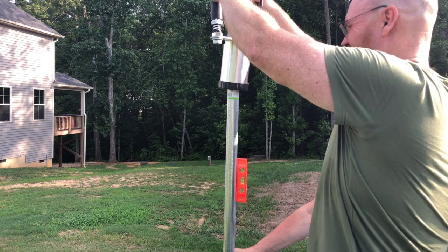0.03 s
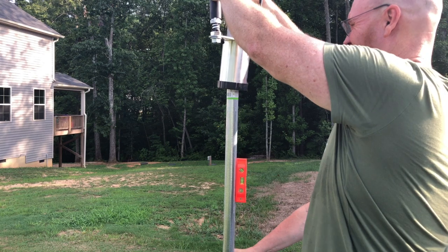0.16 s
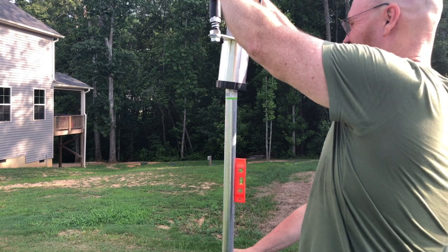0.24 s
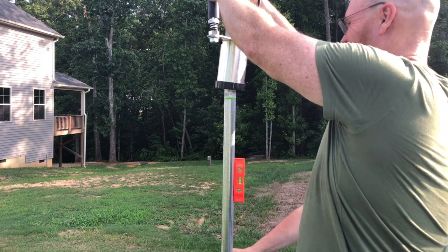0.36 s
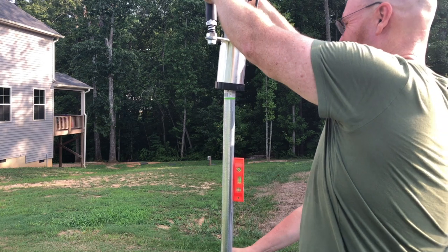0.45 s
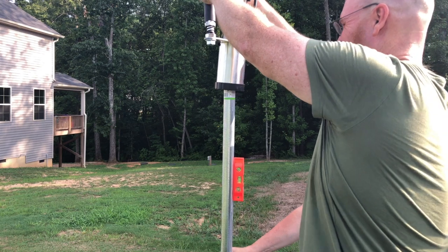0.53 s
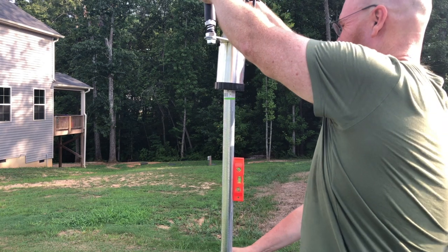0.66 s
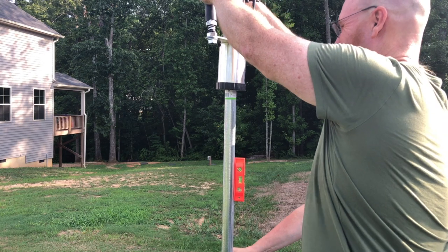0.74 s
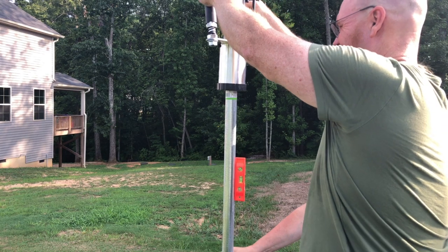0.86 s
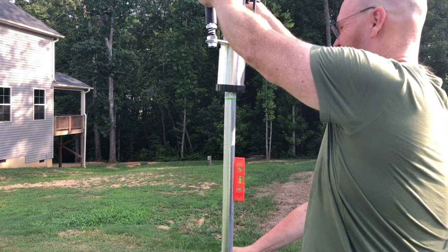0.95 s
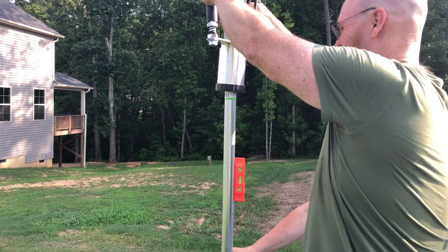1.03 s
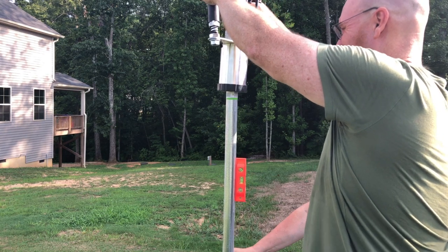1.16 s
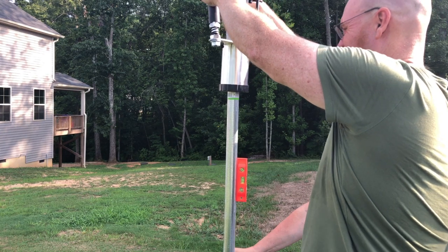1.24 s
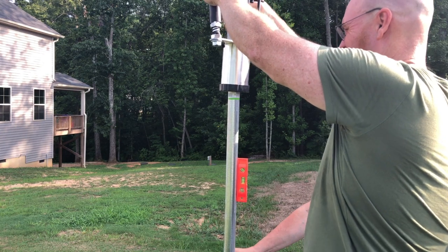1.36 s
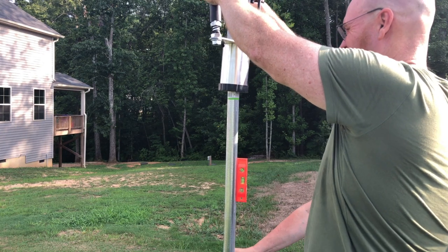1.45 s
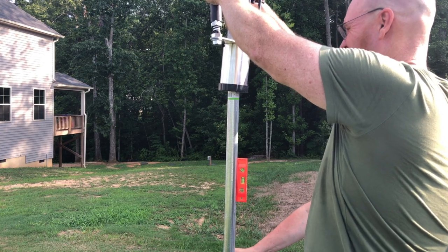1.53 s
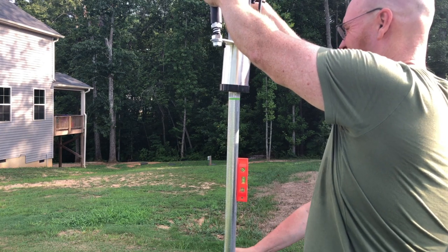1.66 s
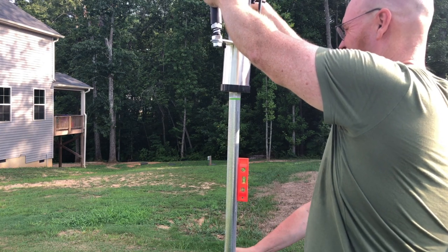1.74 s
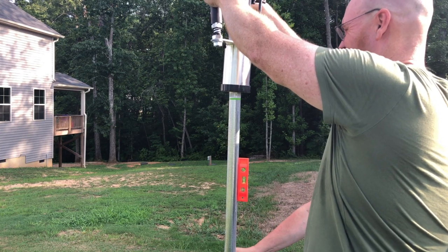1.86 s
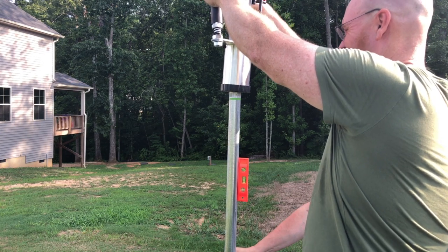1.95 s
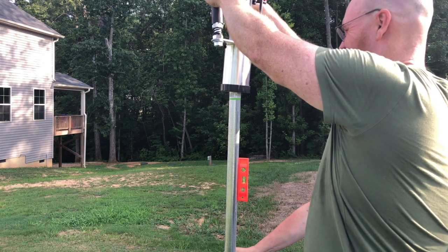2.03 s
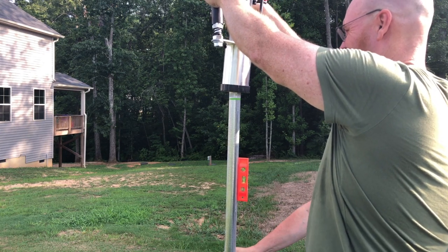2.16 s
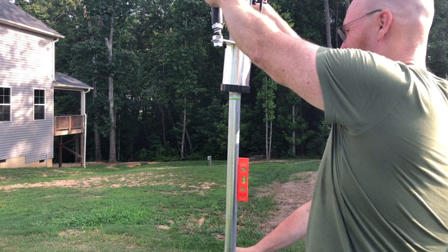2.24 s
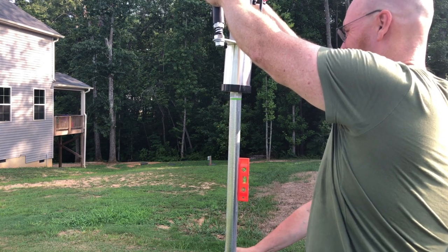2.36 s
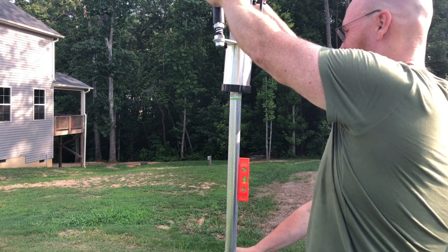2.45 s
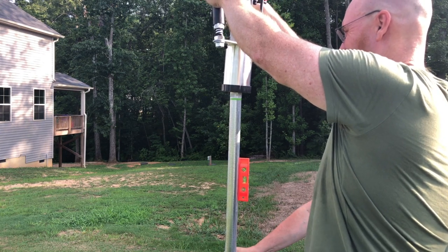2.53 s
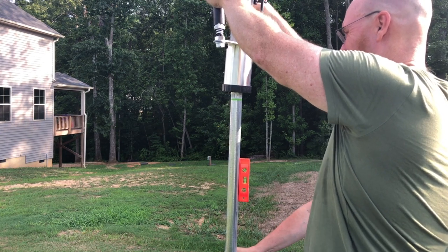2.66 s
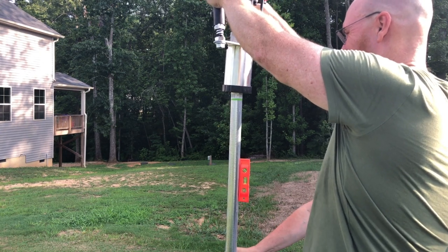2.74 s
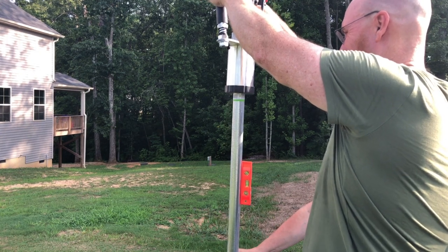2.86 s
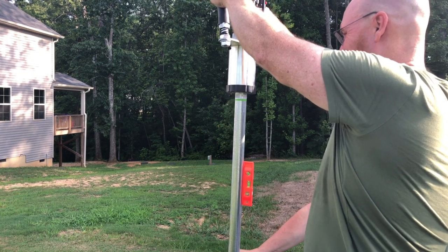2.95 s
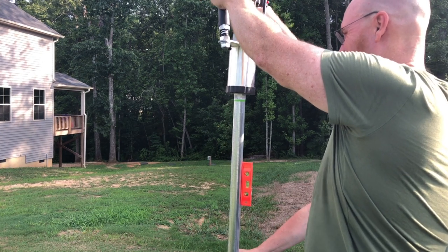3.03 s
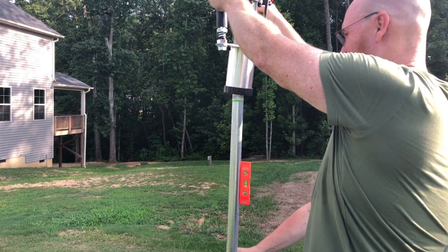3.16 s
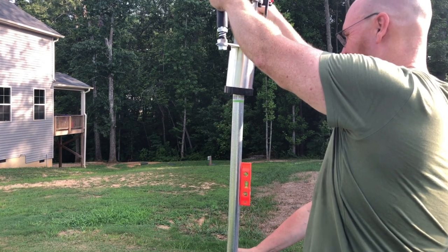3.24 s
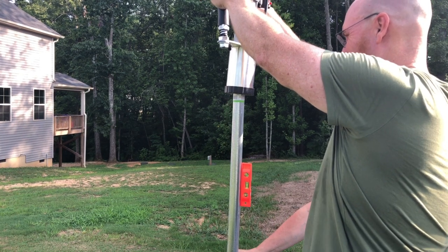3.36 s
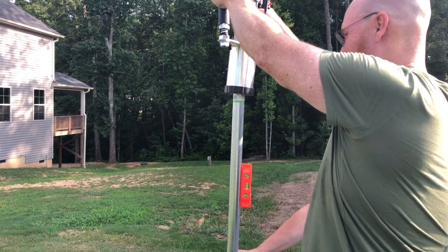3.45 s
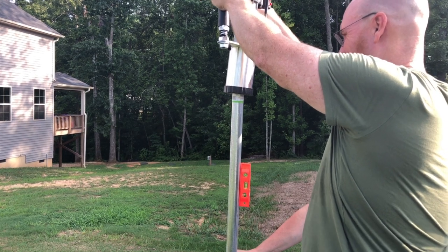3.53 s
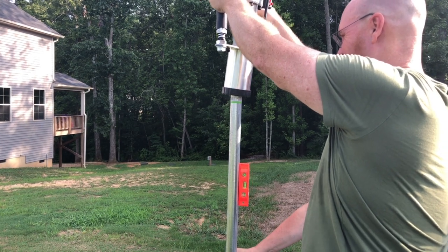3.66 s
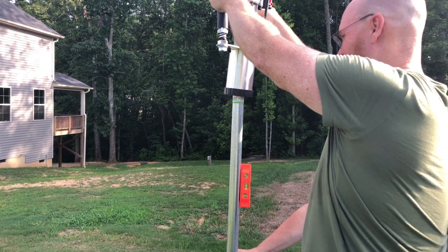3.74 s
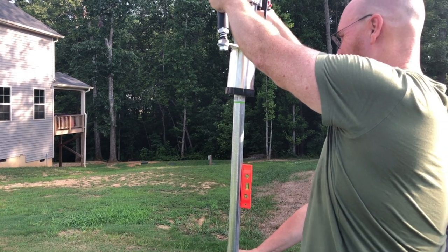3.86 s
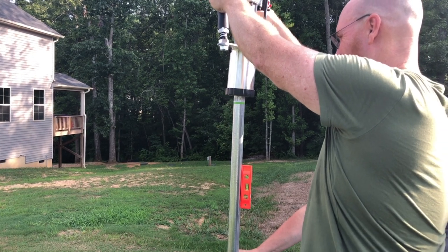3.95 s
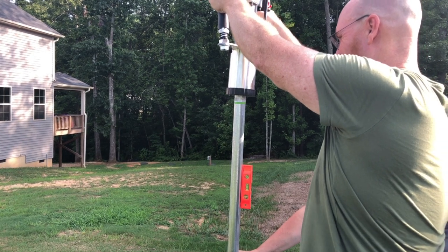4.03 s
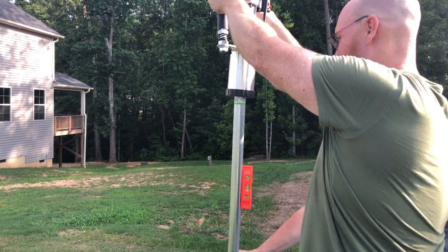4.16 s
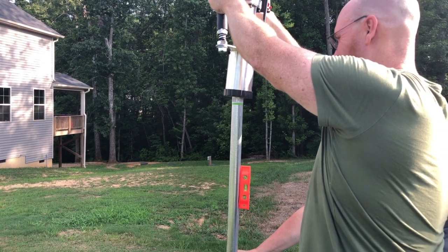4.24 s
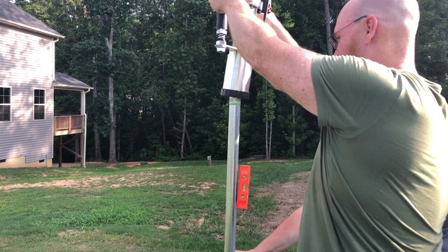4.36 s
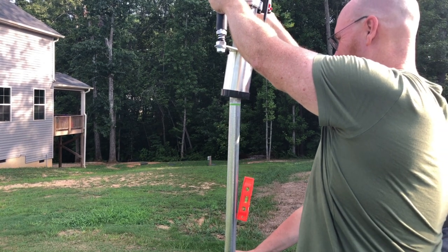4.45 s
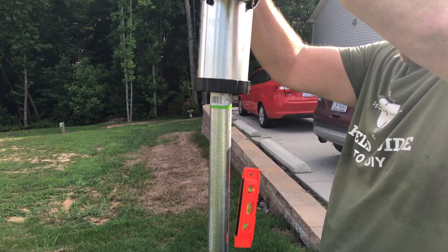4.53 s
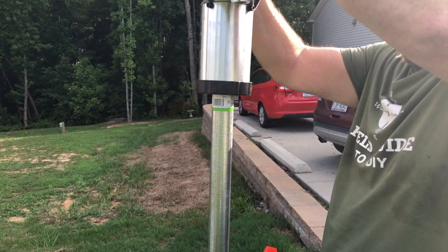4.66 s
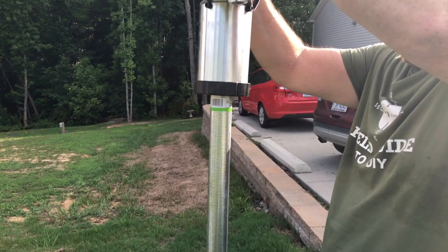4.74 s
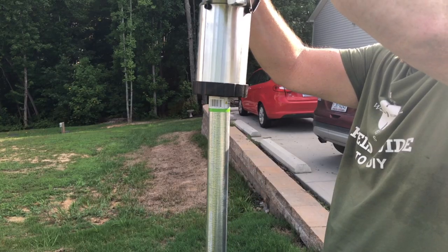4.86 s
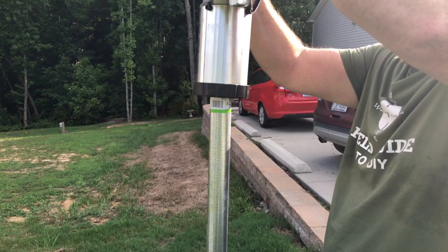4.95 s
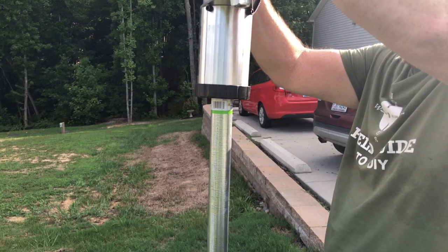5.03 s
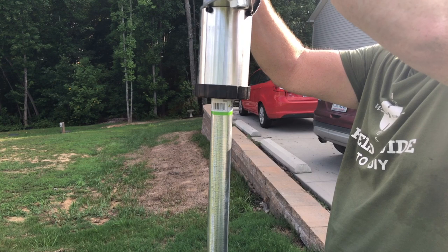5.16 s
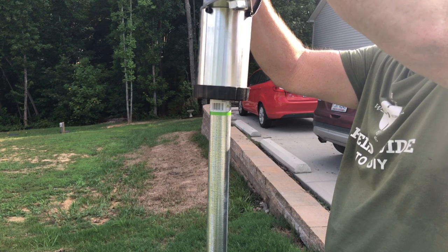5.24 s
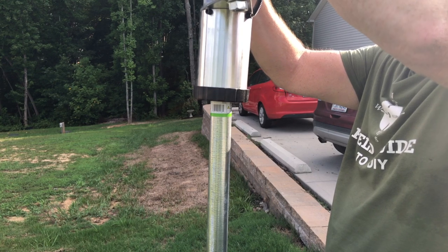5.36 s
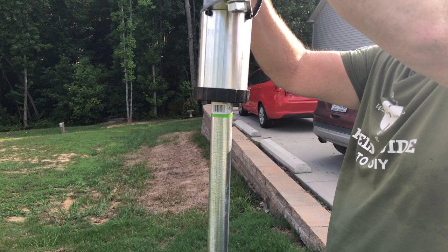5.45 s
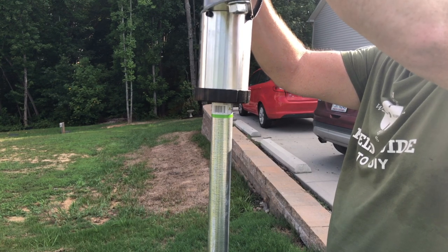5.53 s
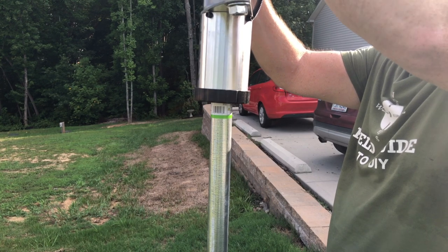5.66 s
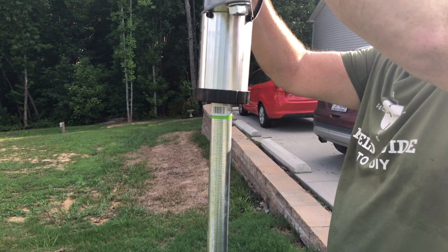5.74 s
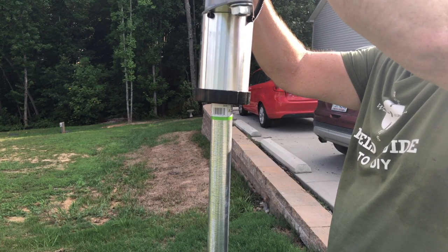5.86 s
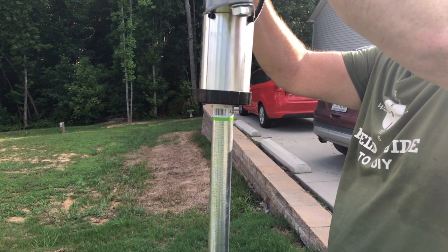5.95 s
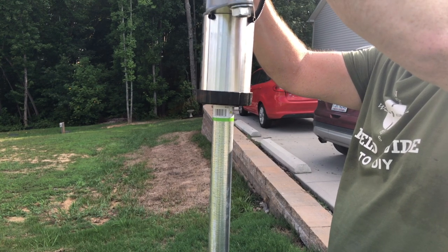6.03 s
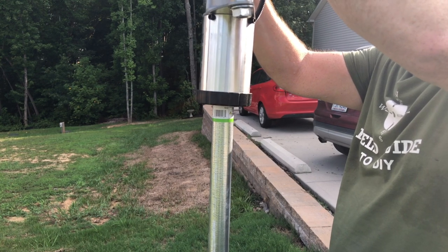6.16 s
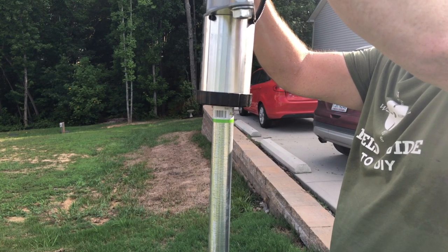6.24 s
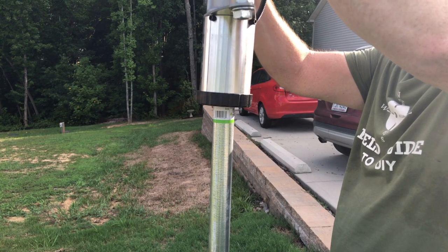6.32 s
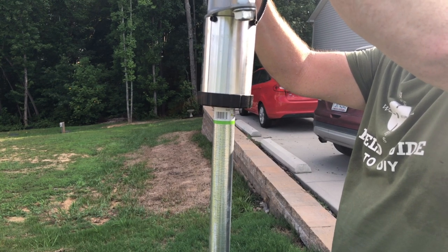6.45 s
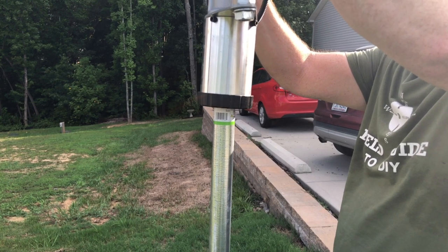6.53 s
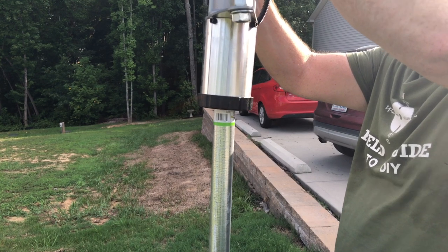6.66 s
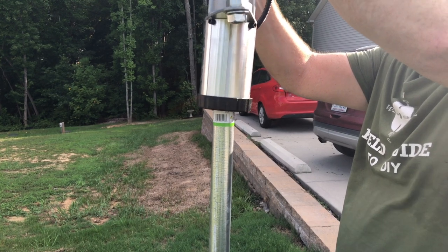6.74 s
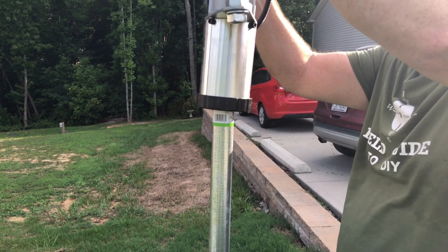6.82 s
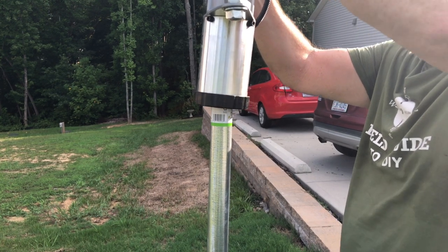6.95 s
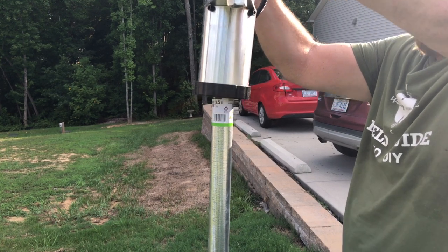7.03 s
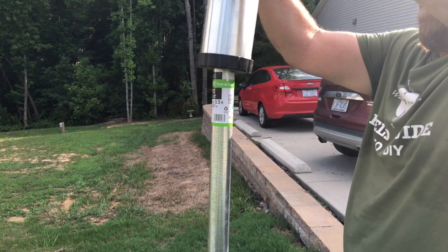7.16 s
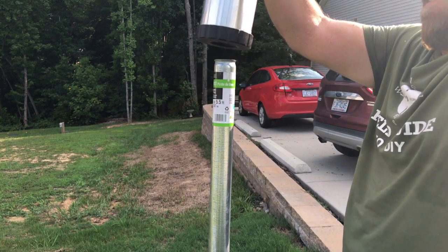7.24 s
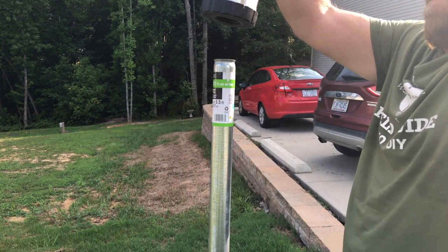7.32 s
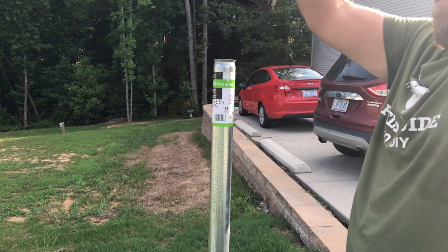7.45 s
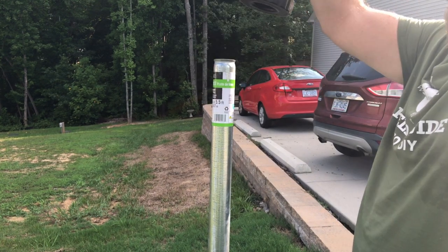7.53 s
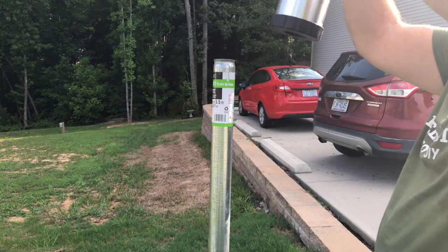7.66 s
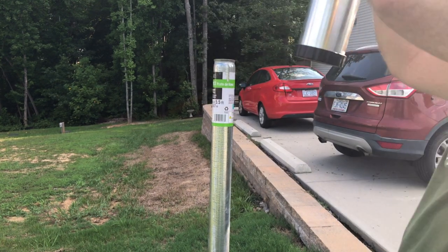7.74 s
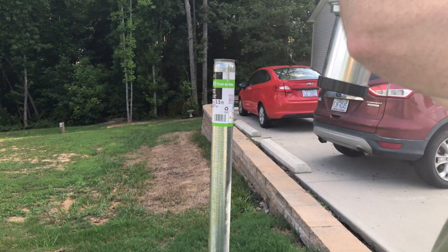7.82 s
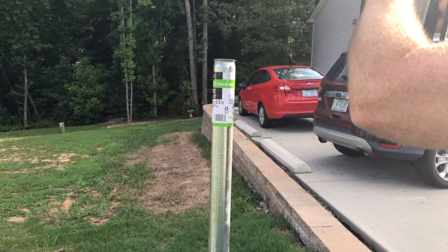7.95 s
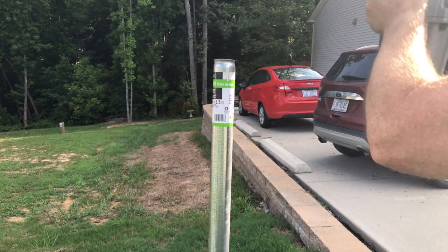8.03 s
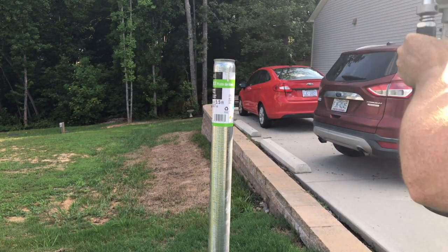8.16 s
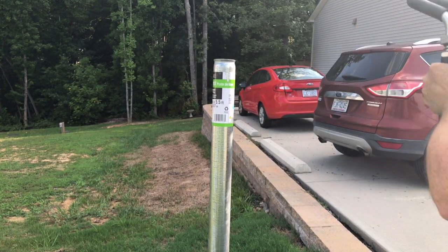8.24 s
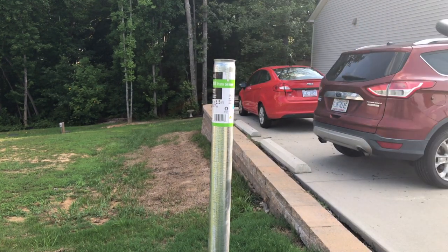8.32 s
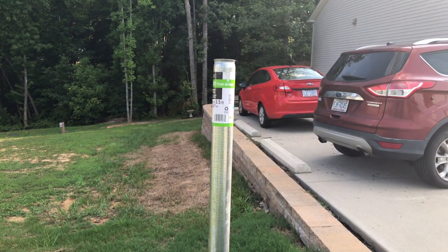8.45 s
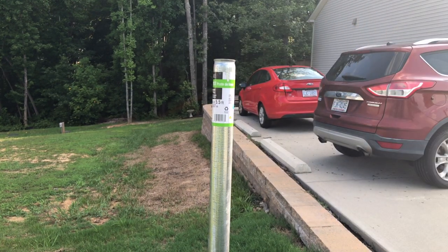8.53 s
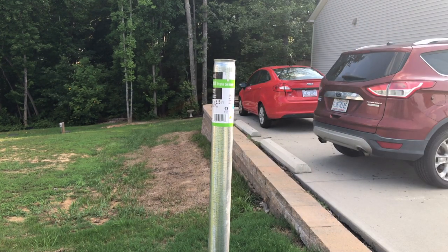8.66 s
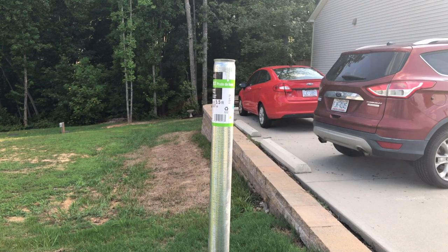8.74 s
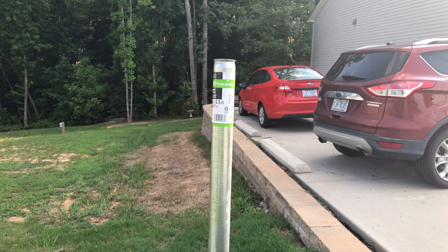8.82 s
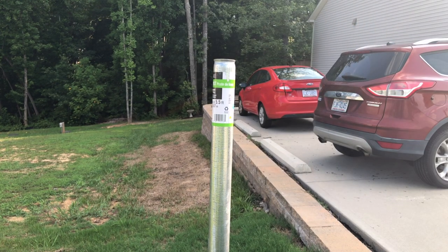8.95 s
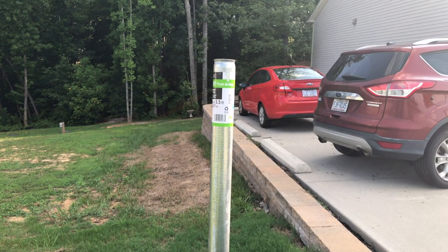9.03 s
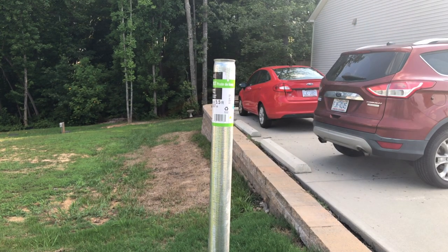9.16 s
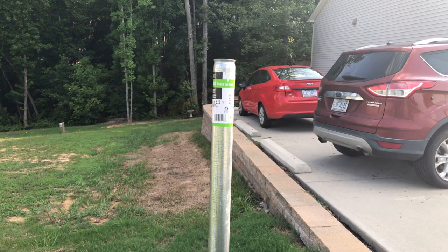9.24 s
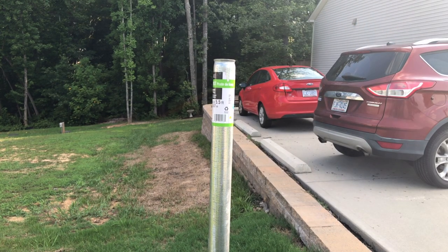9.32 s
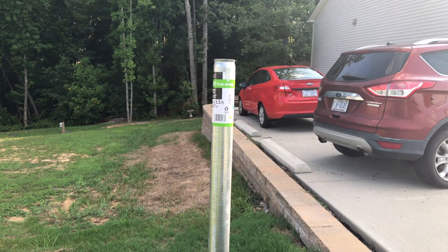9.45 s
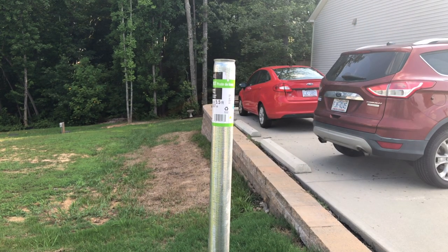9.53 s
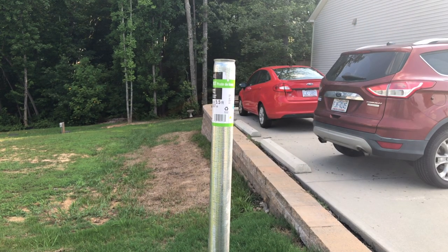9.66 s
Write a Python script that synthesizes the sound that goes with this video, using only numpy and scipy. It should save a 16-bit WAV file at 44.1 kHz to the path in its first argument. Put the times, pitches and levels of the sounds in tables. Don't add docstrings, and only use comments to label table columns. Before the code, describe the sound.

Outdoors, close to a phone microphone with dull treble. From 0 to 2.4 seconds a small four-stroke petrol engine idles, about 26 soft pops a second, slightly uneven, over a thin rattling metal casing. Around 2.5 it revs with a few light clinks, and from 2.65 it hammers a steel post: a much louder, dense machine-gun clatter of some 20 to 27 blows a second, ringing tube, rising hisses of squeezed air, engine drone and low jolts, limited to a crackle. At 4.6 the sound abruptly becomes closer and fuller, with a thin sung ring beneath. Near 6.9 to 7.2 the throttle drops and hard, bright clanks knock the freed post. It is lifted off, puttering at idle, carried past with a rattle near 8.3. At 9.15 the idle changes colour abruptly and continues to the end at about 9.7, over a faint breeze.

```python
import sys
import numpy as np
from scipy import signal
from scipy.io import wavfile
from scipy.ndimage import uniform_filter1d, minimum_filter1d

SR = 44100
rng = np.random.default_rng(int(sys.argv[2]) if len(sys.argv) > 2 else 0)


def transcribe(signal):
    frames = np.atleast_2d(signal).T
    limited = np.clip(frames, -1, 1)
    pcm = np.round(limited * 32767).astype(np.int16)
    wavfile.write(sys.argv[1], SR, pcm)


def to_linear_factor(level_db):
    exponent = np.asarray(level_db, float) / 20
    return 10 ** exponent


N = 427329


def evened(x):
    return x / np.sqrt(np.mean(x ** 2) + 1e-20)


def wander(samples):
    return evened(uniform_filter1d(rng.standard_normal(N), samples))


def band(x, lo_hz, hi_hz):
    return signal.sosfilt(signal.butter(3, [lo_hz, hi_hz], "band", fs=SR, output="sos"), x)


def modes(table, seconds):
    t = np.arange(int(seconds * SR)) / SR
    return sum(to_linear_factor(db - 60 * t / t60) * np.sin(2 * np.pi * hz * t) for hz, db, t60 in table)


def bump(t, at_ms, width_ms):
    return np.exp(-((1000 * t - at_ms) / width_ms) ** 2)


def resonate(x, hz, width):
    turn = np.exp(2j * np.pi * np.cumsum(hz) / SR)
    r = np.exp(-np.pi * width / SR)
    return 2 * (turn * signal.lfilter([(1 - r) ** 2], [1, -2 * r, r * r], x / turn)).real


def swells(rows):
    return sum(db * np.exp(-((np.arange(N) / SR - s) / length) ** 2) for s, db, length in rows)


# start in seconds, blend in seconds.
POSES = [(0, .002), (2.48, .04), (2.655, .002), (3.62, .12), (4.575, .002), (5.7, .2), (6.98, .16),
         (7.28, .06), (8.1, .15), (8.72, .2), (9.148, .002), (9.7, .002)]


def posed(values):
    t = np.arange(N) / SR
    starts = [(-1, 0)] + POSES[1:]
    return sum(v * np.interp(t, [t0 - rise, t0 + rise, t1 - fall, t1 + fall], [0, 1, 1, 0])
               for v, (t0, rise), (t1, fall) in zip(values, starts, POSES[1:]))


# time in seconds, firings per second.
IDLES = [
    [(0.036, 25.57), (0.95, 26.44), (1.5, 25.46), (2.15, 25.9), (2.4, 27.55), (2.56, 43.25)],
    [(7.001, 33.41), (7.45, 28.55), (8.0, 26.76), (8.85, 28.3), (9.145, 28.0)],
    [(9.16, 27.9)],
]
# time in seconds, firings per second.
LOADED = [(2.88, 44), (3.22, 51.6), (3.6, 45.8), (4.55, 48), (4.6, 60), (4.93, 51.5), (5.3, 56.5),
          (5.72, 50.3), (6.7, 50)]


def speed():
    return np.interp(np.arange(N) / SR, *np.transpose(sorted(sum(IDLES, LOADED))))


def turns(rate, starts):
    t, count, total = np.arange(N) / SR, np.zeros(N), np.cumsum(rate) / SR
    for k, s in enumerate(starts):
        later = t >= (s - .012 if k else 0)
        count[later] = (total - np.interp(s, t, total))[later] + 1000 * k + 1000
    return count


def beats(count):
    return np.diff(np.floor(count), prepend=0) == 1


# time in seconds, metal rattle in dB.
EFFORT = [(0, -42.5), (2.431, -42), (2.52, -36.5), (2.65, -29.5), (2.8, -20.5), (3.65, -23), (4.6, -21),
          (5.5, -23), (6.86, -25.5), (6.97, -29), (7.16, -34.5), (7.3, -44.5), (8.1, -42.5), (8.33, -36.5),
          (8.65, -43), (9.14, -38.5), (9.15, -35.5), (9.69, -40)]


def rattle_db():
    return np.interp(np.arange(N) / SR, *np.transpose(EFFORT))


ROAR_DB = [4, 5.3, -5, -5, -4, -1, -0.5, 4, 2, 5, 6]
# start in seconds, extra roar in dB, length in seconds.
SURGES = [(2.72, 7, 0.07), (3.76, 5.5, 0.072), (4.2, 1, 0.23), (4.55, 1.5, 0.15), (4.84, 2.5, 0.067),
          (6.15, 3, 0.15), (6.62, 4.5, 0.14), (5.1, -0.5, 0.069), (7.1, 1, 0.15), (8.0, -4, 0.32),
          (8.44, 2, 0.068), (8.8, 0.5, 0.067), (9.37, 2, 0.043)]


def roar_db():
    return rattle_db() + posed(ROAR_DB) + swells(SURGES)


# frequency in Hz, level in dB per Hz.
RESTING = [
    [(260, -53), (450, -3.5), (1710, -3), (2970, -14), (3720, -1), (4740, -16), (5840, -6), (7200, -22.5)],
    [(180, -38), (300, -19), (524, -9), (771, -9), (1670, -13), (2390, -13), (7200, -25.5)],
]
HAMMERING = [
    [(71, -49.5), (120, -14), (385, -5.5), (2100, -2.5), (2360, -5), (2850, -4.5), (3890, -3), (7200, -4)],
    [(71, -38), (120, -10.5), (385, -6), (2100, -0.5), (2360, -4.5), (2850, -3.5), (3890, 0.5),
     (7200, -3.5)],
    [(71, -48), (120, -16), (750, 0.5), (1190, -8), (1830, 5), (2900, -3), (5960, -4.5), (7200, -2.5)],
    [(71, -48.5), (120, -15), (319, -15.5), (689, -8), (1230, -14.5), (1860, 0), (3600, -6), (7200, -2)],
    [(260, -71), (450, -7), (1440, -11.5), (1850, -0.5), (3230, -17), (6050, -23), (7200, -30.5)],
]
CARRIED = [
    [(260, -50), (450, -16), (794, -16), (1030, -17), (2900, -19), (4220, -17.5), (7200, -26)],
    [(260, -40), (450, -4), (1130, -12), (1310, 2), (2280, -8), (2750, -19), (7200, -25)],
    [(260, -41), (450, -17), (581, -28), (1100, -15), (1960, -18), (2800, -30), (4600, -22), (7200, -33)],
    [(260, -10.5), (450, -6), (477, -39), (1150, -12), (1610, -10.5), (3760, -11), (7200, -17.5)],
]
# frequency in Hz, width in Hz.
RESTING_RINGS = [
    [(754, 90), (1235, 40), (1735, 100), (1987, 60), (2290, 150), (2595, 80), (3215, 90), (3625, 85),
     (3850, 250), (4120, 250), (5280, 130), (5630, 100), (5800, 50), (6100, 200)],
    [(508, 95), (990, 79), (1650, 350), (2620, 66)],
]
HAMMERING_RINGS = [
    [(1620, 260), (2092, 80), (2615, 80), (3192, 100), (3795, 75), (3995, 45), (4265, 75), (5085, 65),
     (5580, 70), (6490, 80)],
    [(1285, 100), (1680, 220), (2090, 75), (2610, 125), (3200, 105), (3800, 110), (5100, 105), (5570, 65),
     (6480, 105), (7050, 65)],
    [(770, 230), (1860, 150), (2090, 65), (2520, 100), (3810, 105), (4480, 400), (5880, 110), (7100, 110)],
    [(690, 400), (1845, 160), (2270, 340), (2500, 120), (4330, 450), (5880, 230), (7110, 90)],
    [(802, 200), (1850, 85), (2180, 100), (2490, 25), (4050, 260), (5850, 75)],
]
CARRIED_RINGS = [
    [(775, 65), (1630, 60), (1962, 150), (2340, 150), (3680, 140), (4090, 320), (4570, 80), (5615, 95)],
    [(791, 110), (960, 40), (1100, 80), (1480, 50), (1960, 90), (2300, 75), (3470, 65), (4150, 600),
     (4580, 250)],
    [(760, 90), (850, 50), (965, 50), (1128, 95), (1480, 90), (1955, 140), (3570, 120), (3790, 150),
     (4200, 320), (5290, 60)],
    [(786, 200), (1140, 110), (1920, 115), (2340, 120), (3120, 130), (3840, 270), (4550, 150), (5250, 170)],
]
RINGS_DB = [
    [-5.5, -5.5, -2, -4.5, -29.5, -17.5, -6, -4.5, -13.5, -11, -9.5, -22, -12, -19.5],
    [-2.5, 0, 4, -21],
    [-1.5, 2, 1, 2, -3.5, -1.5, -4, -4.5, -9.5, -5.5],
    [-10.5, 1.5, 2, -0.5, -4.5, -6, -12.5, -18, -3, -8],
    [-14.5, -1.5, -5.5, 0.5, -5, -7, -4, -3.5],
    [-22.5, 5.5, -5, -6.5, -3, -5, -1.5],
    [-19.5, 2.5, 0.5, 5.5, -13, -18],
    [-10.5, -13, -16.5, -18, -14, -18, -23, -16.5],
    [3.5, -4, 3, 8, 2, -3, -10.5, -16, -18],
    [-2, -5, -3, 7, 2, 3.5, -3, -8, -7, -20],
    [-1.5, -2.5, -16, -14.5, -14, -6, -13, -23],
]
BED_DB = [-7, 2, -2, -1.5, 1.5, -1.5, -8.5, -2.5, -2, 9, -1.5]
HISS_SHARE = [0, 0, 2.6, 2.6, 2.0, 1.3, 0, 0, 0, 0, 0]


def clatter(cycle, blow, hammering):
    t = np.arange(N) / SR
    ticks = to_linear_factor(5.4 * np.minimum(rng.exponential(1, N), 4))
    ticks = ticks * (rng.random(N) < 2500 / SR) * rng.choice([-1, 1], N)
    drive = rng.standard_normal(N) + 0.77 * evened(ticks)
    habit = rng.standard_normal(1650)[(cycle % 1 * 1650).astype(int)] * (1 - hammering)
    valves = 1 + 1.9 * np.exp(-(cycle % 1) / 0.31) + .5 * np.exp(-((cycle - .45) % 1) / 0.34)
    valves = uniform_filter1d(valves, size=110)
    strength = to_linear_factor(2.5 * rng.standard_normal(4000)[blow.astype(int)])
    chatter = 1.6 + 2.35 * strength * np.exp(-(blow % 1) / .5)
    chatter = chatter * hammering + valves * (1 - hammering)
    bounce_db = 3.5 * hammering
    flutter = to_linear_factor(.8 * wander(1800)) * to_linear_factor(bounce_db * wander(260))
    hiss = rising_hiss(blow, hammering)
    low, high = np.zeros(N), np.zeros(N)
    poses = zip(POSES, POSES[1:], RESTING + HAMMERING + CARRIED,
                RESTING_RINGS + HAMMERING_RINGS + CARRIED_RINGS, RINGS_DB, BED_DB, HISS_SHARE)
    for (t0, rise), (t1, fall), colour, places, heights, bed_db, share in poses:
        a, b = max(round((t0 - rise) * SR), 0), min(round((t1 + fall) * SR), N)
        gate = np.interp(np.arange(a, b) / SR, [t0 - rise, t0 + rise, t1 - fall, t1 + fall], [0, 1, 1, 0])
        gate = np.sqrt(gate)
        held = np.sqrt(np.mean(gate ** 2))
        rings = [(hz, width, db) for (hz, width), db in zip(places, heights)]
        taps = body(colour, rings, bed_db)
        shaking = (drive + habit) * valves ** 0.55 + share * hiss
        striking = drive[::-1] * chatter * flutter + share * hiss
        roar = signal.oaconvolve(shaking[a:b] * gate, taps)[:N - a]
        ring = evened(signal.oaconvolve(striking[a:b] * gate, taps)[:N - a])
        if hammering[a:b].any():
            ring[:b - a] += 0.59 * struck(drive[a:b], blow[a:b], rings) * (gate * hammering[a:b])
        if share == 0:
            casing = band(roar, 1300, 2750) / np.std(band(roar, 1900, 2600))
            ring = band(ring, 2600, 7600) - np.std(band(ring, 1900, 2600)) * casing
        low[a:a + len(roar)] += held * band(roar, 25, 1900) / np.std(band(roar, 600, 1900))
        high[a:a + len(ring)] += held * evened(band(ring, 1900, 7600))
    sunk = np.interp(t, [3.8, 4.2, 4.57, 4.6], [0, 0.15, 0.46, 0.0])
    treble = signal.sosfiltfilt(signal.butter(2, 3000, "high", fs=SR, output="sos"), high)
    return to_linear_factor(roar_db()) * low + to_linear_factor(rattle_db()) * (high - sunk * treble)


def rising_hiss(blow, hammering):
    stroke = blow + .22
    number = stroke.astype(int)
    force, pitch = rng.standard_normal((4000, 2)).T
    hz = 1380 * to_linear_factor(4.2 * (stroke % 1) + .6 * np.clip(pitch[number], -1.5, 1.5))
    hz = hz * to_linear_factor(.6 * wander(350))
    hiss = evened(resonate(rng.standard_normal(N), hz, 520)) * hammering * .3
    return hiss * to_linear_factor(1.5 * force[number]) * np.interp(np.arange(N) / SR, [4.1, 4.4], [1, .6])


# frequency in Hz, level in dB per Hz.
DULL_TOP = [(9360, -55), (15800, -120)]


def body(colour, rings, bed_db):
    hz = np.abs(np.fft.fftfreq(8192, 1 / SR))
    f, db = np.transpose(colour + DULL_TOP)
    power = to_linear_factor(2 * (np.interp(np.log(hz + 1), np.log(f), db) + bed_db))
    for f0, width, top_db in rings:
        power = power + to_linear_factor(2 * top_db) / (1 + (2 * (hz - f0) / width) ** 2) ** 2
    log_gain = np.log(power + 1e-9) / 2
    return np.fft.ifft(np.exp(log_gain - 1j * signal.hilbert(log_gain).imag)).real[:4096]


def struck(drive, blow, rings):
    out = np.zeros(len(drive))
    for hz, width, db in rings:
        if hz > 1900:
            share = to_linear_factor(db + 5 * np.clip(rng.standard_normal(4000), -2, 2))[blow.astype(int)]
            peak = signal.iirpeak(hz, hz / max(width * 0.87, 45), SR)
            out += signal.lfilter(*peak, drive * share * np.exp(-(blow % 1) / 1.24))
    return evened(out)


# pitch in Hz, level in dB, t60 in seconds.
TUBE = [(1860, -2, 0.15), (2490, -12, 0.5), (2180, -10, 0.1)]
# pitch in Hz, level in dB, t60 in seconds.
BARREL = [(5855, 0, 0.06), (4280, -14, 0.03)]
# start in seconds, peak in dB, share of bright modes, share of crack,
# extra damping in dB per second.
CLINKS = [(2.487, -27, .5, .5, 200), (2.515, -24, .3, .3, 200), (2.54, -25, .2, .3, 200),
          (6.889, -14, .1, .2, 600), (6.905, -9, .2, .5, 300), (6.968, -13, .05, .3, 500),
          (6.995, -15, .05, .8, 800), (7.008, -24, 1.5, .1, 200), (7.028, -13, .05, .3, 300),
          (7.052, -17, .05, .2, 600), (7.09, -19, .05, .2, 600), (7.137, -23, .1, .9, 500),
          (7.143, -30, 1.5, .05, 900), (7.176, -25, .03, .5, 900), (7.194, -23, .05, .2, 700),
          (7.243, -23, .02, .08, 50), (7.417, -18, .02, .2, 1400), (7.43, -29, .02, .05, 100)]


def knocks():
    out = np.zeros(N)
    t = np.arange(int(.6 * SR)) / SR
    for s, peak_db, bright, crack, damp_db in CLINKS:
        snap = band(rng.standard_normal(len(t)), 1200, 7000) * to_linear_factor(-60 * t / 0.051)
        knock = modes(TUBE, .6) + bright * modes(BARREL, .6) + crack * snap
        knock = to_linear_factor(peak_db - 5.5 - damp_db * t) * knock
        out[round(s * SR):][:len(knock)] += knock
    return out


def thin_line(blow, hammering):
    late = np.arange(N) > POSES[5][0] * SR
    hits = beats(blow) * hammering * late * rng.standard_normal(N)
    return to_linear_factor(-34.5) * signal.oaconvolve(hits, modes([(2490, 0, 0.59)], 0.91))[:N]


POP_DB = [-45.5, -38, -48, -60, -36.5, -60.5, -45, -45.5, -39.5, -39.5, -33.5]
# start in seconds, extra pop in dB, length in seconds.
COUGHS = [
    (2.52, -2.5, 0.058),
    (2.72, 6, 0.09),
    (3.246, 19.5, 0.027),
    (3.85, 18, 0.13),
    (4.96, 0.5, 0.089),
    (7.966, 4, 0.083),
]


def pops(cycle):
    t = (np.arange(1400) - 300) / SR
    exhaust = -bump(t, -0.91, 0.62) + 0.43 * bump(t, 0.19, 1.0)
    exhaust += -0.07 * bump(t, 1.2, 0.13) + 0.15 * bump(t, 0.64, 0.45)
    intake = 0.5 * bump(t, -0.65, 0.91) - 0.7 * bump(t, 0.23, 0.48) + 0.13 * bump(t, 1.0, 0.22)
    after = np.maximum(t, 0)
    muffler = .15 * (t > 0) * np.sin(2 * np.pi * 770 * after) * to_linear_factor(-60 * after / 0.091)
    out = np.zeros(N)
    for shape, lag, spread_db in ((exhaust + muffler, 0, 2.2), (intake + 0.21 * muffler, .285, 1.5)):
        size = to_linear_factor(spread_db * uniform_filter1d(rng.standard_normal(N), 400) * 20)
        out += signal.oaconvolve(beats(cycle - lag) * size, shape)[300:N + 300]
    rms = np.sqrt(uniform_filter1d(band(out, 100, 450) ** 2, 9000) + 1e-9)
    return to_linear_factor(posed(POP_DB) + swells(COUGHS)) * band(out, 78, 7000) / rms


# multiple of the firing rate, level in dB.
ORDERS_DB = [(2, -42.5), (4, -46), (5, -48), (6, -71), (7, -51.5), (8, -62), (9, -45.5)]


def drone(cycle, hammering):
    late_db = np.where(np.arange(N) > POSES[4][0] * SR, 0, -4.0)
    out = np.zeros(N)
    for order, db in ORDERS_DB:
        out += to_linear_factor(db + 2.5 * wander(7000)) * np.sin(2 * np.pi * (order * cycle + rng.random()))
    return out * to_linear_factor(late_db) * hammering ** 3


# start in seconds, peak in dB, sign.
JOLTS = [(2.785, -32, 1.0), (2.836, -32, -1.0), (2.984, -30, -1.0), (3.23, -27.5, -1.0),
         (3.488, -26.5, -1.0), (3.619, -30.5, -1.0), (4.213, -28.5, -1.0), (4.476, -34.5, -1.0),
         (4.519, -35, -1.0), (4.752, -27.5, -1.0), (4.9, -27.5, -1.0), (5.065, -26.5, 1.0),
         (5.138, -36.5, 1.0), (5.321, -31.5, -1.0), (5.394, -27, -1.0), (5.469, -23.5, -1.0),
         (5.746, -28, -1.0), (5.789, -32.5, -1.0), (5.829, -23.5, -1.0), (5.873, -39.5, -1.0),
         (5.916, -26.5, -1.0), (5.962, -32.5, 1.0), (6.16, -26, -1.0), (6.285, -33, -1.0),
         (6.369, -32, -1.0), (6.41, -32, 1.0), (6.539, -28.5, -1.0), (6.658, -28.5, -1.0)]


def jolts(blow, hammering):
    t = (np.arange(2400) - 600) / SR
    shape = bump(t, 0, 2.63) - 0.56 * bump(t, 8.8, 6.4)
    train = beats(blow) * hammering * to_linear_factor(-42) * rng.standard_normal(N)
    for s, peak_db, sign in JOLTS:
        train[round(s * SR)] += sign * to_linear_factor(peak_db + 2.0)
    return signal.oaconvolve(train, shape)[600:N + 600]


def thunks(blow):
    hits = beats(blow) * to_linear_factor(6.3 * rng.standard_normal(N))
    sinking = np.interp(np.arange(N) / SR, [3.2, 3.45, 4.45, 4.55], [0, 1, 1, 0])
    return signal.oaconvolve(hits * sinking, modes([(1253, -25.5, 0.045)], .1))[:N]


# centre in seconds, pitch in Hz, level in dB, length
# in seconds.
HUMS = [(.38, 515, -40, 0.039), (0.885, 1440, -39.5, 0.031), (1.051, 980, -43, .03),
        (1.058, 2200, -48, 0.046), (1.323, 2260, -48, 0.043), (1.37, 1580, -41, .04),
        (1.435, 4020, -42, 0.036), (2.022, 2300, -42, 0.017), (6.921, 1770, -23.5, 0.038),
        (9.375, 1180, -36, 0.074), (9.639, 1140, -30.5, 0.023), (2.561, 1700, -31.5, 0.062),
        (2.72, 554, -36.5, 0.066), (3.008, 1070, -32, 0.072), (3.76, 795, -31, 0.055),
        (4.148, 773, -33.5, 0.063), (4.295, 893, -34, 0.057), (4.843, 826, -28.5, 0.047),
        (5.132, 700, -28.5, 0.092), (5.443, 495, -33, 0.067), (5.956, 720, -36, 0.089),
        (6.298, 634, -36, 0.094), (7.173, 716, -38.5, 0.076)]


def hums():
    out = np.zeros(N)
    for s, hz, db, length in HUMS:
        t = np.arange(-2 * length, 2 * length, 1 / SR)
        tone = evened(resonate(rng.standard_normal(len(t)), hz + 0 * t, 220))
        out[round((s - 2 * length) * SR):][:len(t)] += to_linear_factor(db) * np.exp(-(t / length) ** 2) * tone
    return out


def breeze():
    return to_linear_factor(-58.5) * evened(band(rng.standard_normal(N), 28, 300))


def scene():
    t = np.arange(N) / SR
    cycle = turns(speed(), [idle[0][0] for idle in IDLES])
    clutch = np.interp(t, [2.655, 3.0], [.62, 1])
    blow = turns(speed() / 2.09 * clutch, [2.655, 2.838, 4.607])
    hammering = np.interp(t, [2.65, 2.655, 6.75, 7.05], [0, 1, 1, 0])
    machine = clatter(cycle, blow, hammering) + knocks() + thin_line(blow, hammering)
    machine += pops(cycle) * (1 - .5 * hammering) + drone(cycle, hammering)
    machine += jolts(blow, hammering) + thunks(blow) + hums()
    excess = to_linear_factor(0.69 * np.maximum(rattle_db() + 31.5, 0))
    return (machine * excess + breeze())[None]


def roll_off(x):
    return signal.sosfilt(signal.butter(12, 15830, fs=SR, output="sos"), x)


def record(dry):
    peak = -minimum_filter1d(-np.abs(dry), size=61)
    squeeze = uniform_filter1d(np.minimum(1, 0.18 / (peak + 1e-9)) ** 0.84, size=41)
    edge = signal.firwin(401, 7183, window=("kaiser", 10), fs=SR)
    narrow = signal.oaconvolve(dry * squeeze, edge[None], "same")
    return roll_off(np.clip(narrow, -0.202, 0.202))


dry = scene()
out = record(dry)
transcribe(out)
```